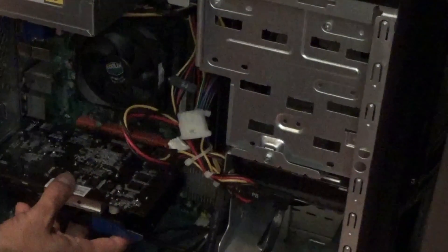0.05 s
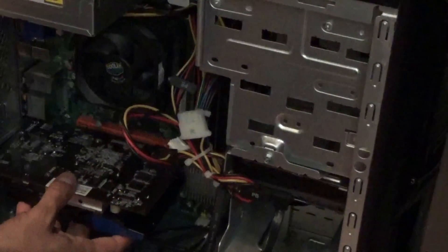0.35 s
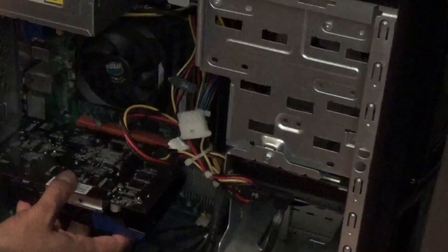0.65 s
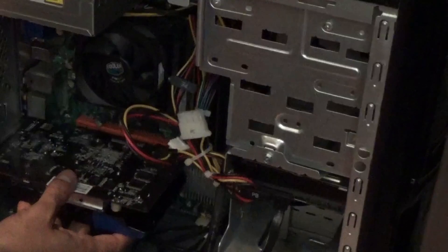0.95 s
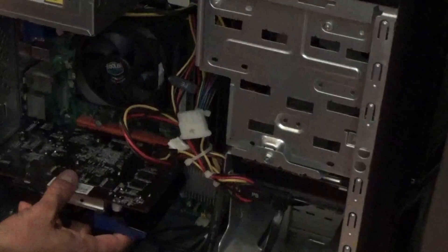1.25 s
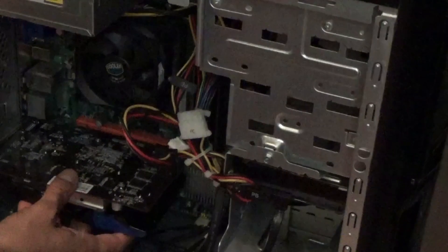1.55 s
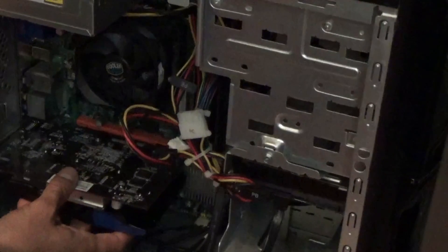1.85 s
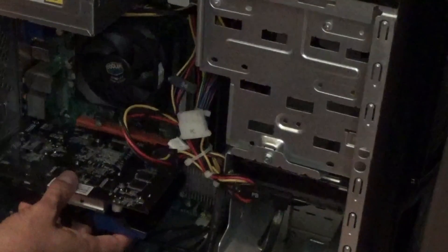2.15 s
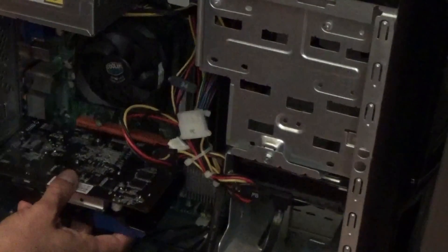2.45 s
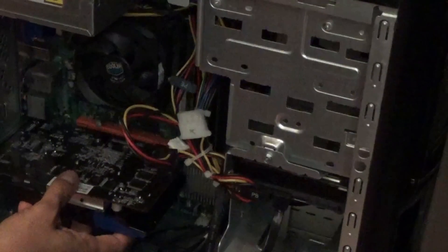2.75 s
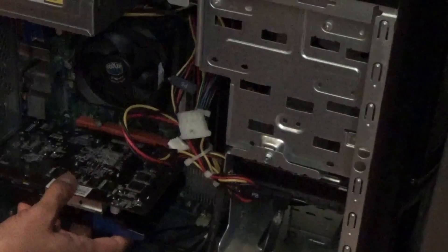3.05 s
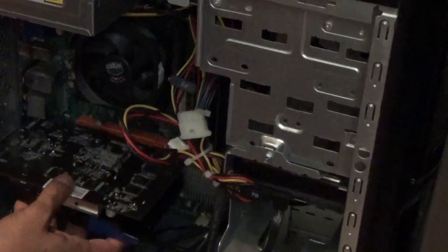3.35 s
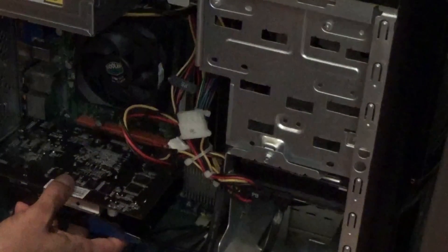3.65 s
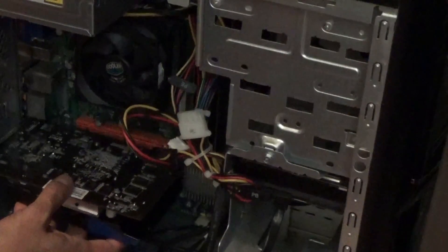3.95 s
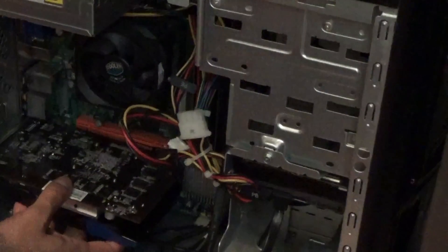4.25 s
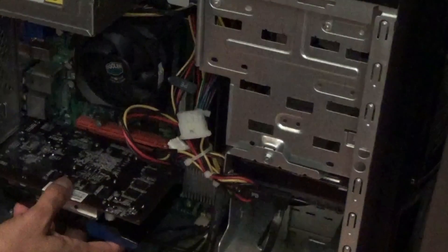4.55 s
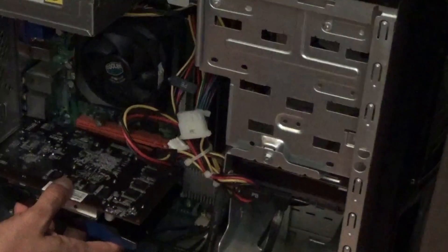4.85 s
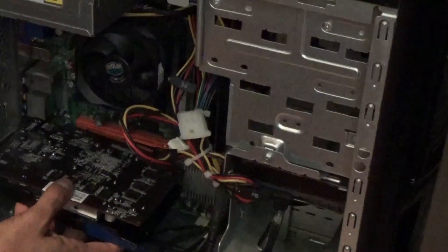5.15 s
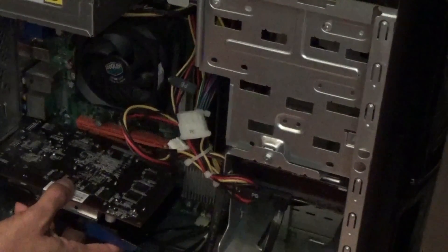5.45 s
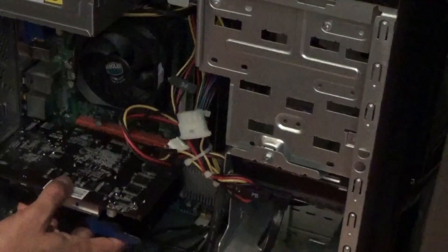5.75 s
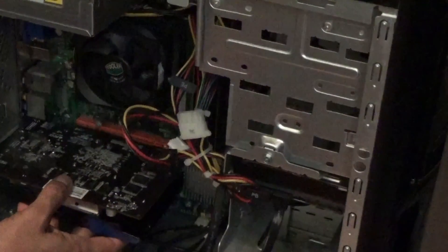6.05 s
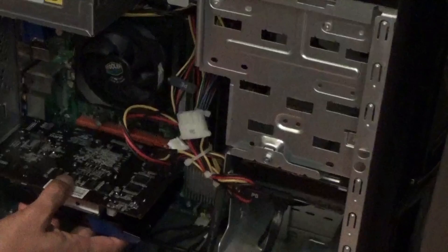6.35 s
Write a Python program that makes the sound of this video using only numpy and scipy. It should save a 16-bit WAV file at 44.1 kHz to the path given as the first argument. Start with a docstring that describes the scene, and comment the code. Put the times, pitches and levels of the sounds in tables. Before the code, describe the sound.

A hand works a graphics card into its slot in an open steel computer case, heard close in a small quiet room. A short scrape and a click come in the first 0.3 seconds, followed by light scrapes and soft taps from about 0.9 to 2.4 seconds. At 2.6 seconds sharp clicks begin a busy run of knocks and gritty scrapes, each setting the sheet metal ringing briefly. This is loudest around 3.5 seconds and again around 4 seconds, and eases after 4.5 seconds into small ticks, slides and faint rubbing. Another sharp click, scrape and knock come at about 5.8 seconds, then two faint scrapes just after 6 seconds. Underneath throughout lie soft room noise, a faint low electrical hum and a very faint, rapid, high ticking.

```python
"""Seating a graphics card

A hand works a card into its slot in an open steel computer case, in a small quiet room.
Card and bracket click, knock and scrape: each contact is a burst of gritty noise that sets the
sheet metal ringing. Underneath lie a faint rapid ticking, soft room noise and mains hum."""
import sys
import numpy as np
from scipy import signal
from scipy.fft import rfft, irfft, next_fast_len
from scipy.io import wavfile
from scipy.ndimage import uniform_filter1d

SR = 44100
rng = np.random.default_rng(int(sys.argv[2]) if len(sys.argv) > 2 else 0)


def unload_wav(signal):
    """Save mono or channel-first audio to the path in sys.argv[1] as 16-bit WAV at rate SR, clipped to [-1, 1]."""
    wavfile.write(
        sys.argv[1],
        SR,
        np.round(np.clip(np.atleast_2d(signal).T, -1, 1) * 32767).astype(np.int16),
    )


N = 282681
TIME = np.arange(N) / SR
FFT_SIZE = next_fast_len(N + SR, True)
FREQS = np.maximum(np.fft.rfftfreq(FFT_SIZE, 1 / SR), 1)

# The card knocks on slot and case: start_s, level_db, hardness_db, t60_s, pitch_hz (0 for no clear note)
# Hardness is treble against mids: bare metal above 0, board and fingertip far below.
# A firm grip shortens the decay.
CARD_KNOCKS = [(0.059, -36, -20, .065, 0), (0.129, -44, -7, .15, 0), (0.268, -29, -2, .16, 3240),
               (1.605, -44.5, -18, .07, 0), (1.7, -42, -10, .2, 1650), (1.833, -41.5, -8, .13, 900),
               (2.145, -39.5, -14, .11, 635), (2.437, -45, -13, .16, 0), (2.6205, -26, 6, .1, 0),
               (2.629, -25, -7, .26, 1286), (2.687, -31, 6, .17, 0), (2.738, -38.5, 5, .11, 0),
               (2.782, -30.5, -30, .08, 0), (2.928, -29, -13, .022, 0), (2.988, -28, -16, .14, 2400),
               (3.04, -29, 3, .28, 0), (3.22, -25.5, -7, .21, 0), (3.413, -35, -11, .11, 0),
               (3.476, -17.5, -1, .22, 2300), (3.619, -40, 2, .14, 0), (3.8155, -32, 1, .18, 0),
               (3.9645, -21, 5, .18, 4130), (4.029, -23, -6, .21, 1260), (4.199, -26.5, -9, .16, 2000),
               (4.237, -25.5, 9, .07, 8900), (4.423, -29.5, -10, .015, 0), (4.446, -28.5, -9, .17, 1496),
               (4.607, -47, -1, .3, 0), (4.756, -43, -4, .1, 0), (4.981, -47, -4, .1, 0),
               (5.589, -35.5, -28, .09, 1273), (5.756, -25.5, 7, .13, 3970), (5.856, -31.5, -5, .15, 2460)]
# The card slides, swelling until it comes to rest: stop_s, level_db, hardness_db, swell_s
CARD_SLIDES = [(0.022, -43.5, 3, .03), (0.177, -34, -5, .03), (0.89, -39.5, 0, .011),
               (1.165, -40.5, -1, .03), (1.215, -44, 1, .03), (1.265, -47, -3, .03), (1.71, -41, -2, .035),
               (1.842, -42, -9, .03), (2.295, -51, 2, .08), (2.705, -31, -4, .02), (3.072, -21, 4, .032),
               (3.09, -24, -8, .03), (3.19, -32, -14, .022), (3.33, -41, -20, .05), (3.37, -42.5, -10, .02),
               (3.459, -26.5, -2, .014), (3.506, -18.5, 1, .028), (3.745, -44.5, 0, .07),
               (3.855, -33.5, -20, .06), (4.088, -18, -2, .055), (4.195, -35, -5, .03),
               (4.277, -31, -6, .1), (4.445, -37, -4, .025), (4.78, -33.5, -5, .03),
               (4.908, -37.5, -1, .01), (5.107, -41.5, 1, .06), (5.313, -41, -2, .006),
               (5.492, -42, -18, .028), (5.633, -42.5, -3, .01), (5.756, -27, 5, .009),
               (5.795, -32.5, -3, .04), (6.112, -48, -14, .01), (6.231, -45.5, -4, .024)]
# Fingers and cables rub lightly between contacts: time_s, level_db
RUB_LEVELS = [(0.2, -51), (0.55, -65), (1.9, -60), (2.9, -59), (3.3, -50), (3.7, -53), (4.35, -46),
              (4.6, -60), (5.55, -59), (6.4, -62)]
# The four bands of a contact (thud, clatter, clink, tick): low_hz, high_hz, tail_share, tail_t60_s
CONTACT_BANDS = [(92, 687, 0.39, 0.43), (702, 2725, 0.41, 0.15), (2660, 5660, 0.12, 0.17),
                 (5970, 10700, 0, 0.6)]
# Standout resonances of the steel case: pitch_hz, width_hz, gain_db
STEEL_MODES = [(232.8, 22, 3.5), (365.7, 28, 0.5), (706, 160, -5.5), (1009, 15, 0), (1303, 53, -1.5),
               (2054, 190, -16), (2240, 36, -6), (3010, 18, -4.5), (3285, 43, -7.5), (3520, 23, -8),
               (3800, 35, -9), (4090, 81, -7.5)]
# Its dense lesser modes, blended into one tone curve: freq_hz, gain_db
STEEL_COLOUR = [(90, -25.5), (185, -13.5), (300, -6), (520, -9.5), (900, -7.5), (1400, -6), (2400, -5.5),
                (2800, -12.5), (4300, -12.5), (5500, -10.5), (6400, -22.5), (7200, -17.5), (8300, -13),
                (11000, -12.5)]
# Stereo width of the nearby case: freq_hz, side_vs_mid_db
CASE_SPREAD = [(170, -24), (600, -17), (3000, -11)]
# Fader curve of the faint ticking: time_s, level_db
TICKING_LEVELS = [(0.8, -59.5), (1.1, -61.5), (3.0, -65)]
# Tone curve of the room noise: freq_hz, gain_db
ROOM_COLOUR = [(12, -30), (20, -4.5), (124, -6.5), (194, -13.5), (233, -2), (273, -13), (365, -12),
               (603, -14.5), (1260, -17.5), (1370, -19.5), (1520, -17), (2200, -24), (3100, -21),
               (11000, -28.5), (14300, -78), (22000, -120)]
# Stereo width of the diffuse room: freq_hz, side_vs_mid_db
ROOM_SPREAD = [(80, -17), (200, -12), (600, 2.5), (11000, -6)]
# Partials of the mains hum: pitch_hz, rms_db
HUM_PARTIALS = [(120, -68), (240, -79)]

KNOCK_SWELL_S, SLIDE_T60_S = .0014, .125   # a swell is the time taken to rise 20 dB
GRAZE_DB, GRAZE_SWELL_S = -22, .014   # an edge grazes just ahead of the hit, this far below it
CUTOFF_HZ = 11020


def card_in_case(level_db, build_cycles):
    """Bursts of tiny impacts drive the chassis, band by band; the thud builds slowest and hangs longest."""
    body = chassis(modes_db=0.5)
    body = body / np.sqrt(np.mean(body ** 2 * (FREQS < CUTOFF_HZ)))
    grit_db = chatter(per_s=800, spread_db=3.5)
    powers = contact_power() + rubbing_power(per_s=22, uneven_db=3.0, hardness_db=-7)
    out = 0
    for (low, high, tail_share, tail_t60), power in zip(CONTACT_BANDS, powers):
        grit = rms_one(from_db(grit_db * np.sqrt(high / CUTOFF_HZ)))   # slips stand out most in the treble
        envelope = np.sqrt(build_up(power, build_cycles / high))
        force = envelope * grit * rng.standard_normal((2, N))
        band = 1 / np.sqrt((1 + (low / FREQS) ** 10) * (1 + (FREQS / high) ** 10))
        vibration = filtered(force, causal(body * band))
        out = out + diffuse_tail(vibration, tail_share, tail_t60)
    return from_db(level_db) * stereo(out, CASE_SPREAD)


def contacts():
    """Knocks and slides on one cue list: peak_s, level_db, hardness_db, swell_s, t60_s."""
    knocks = [(s, db, hardness, KNOCK_SWELL_S, t60) for s, db, hardness, t60, _ in CARD_KNOCKS]
    slides = [(s, db, hardness, swell, SLIDE_T60_S) for s, db, hardness, swell in CARD_SLIDES]
    return knocks + slides


def band_levels(level_db, hardness_db):
    """Thud, clatter, clink and tick in dB: a harder contact has more top and less thud."""
    thud_db = 1.2 - .12 * hardness_db
    clink_db = 1.3 + .68 * hardness_db
    return level_db + np.array([thud_db, 0, clink_db, hardness_db])


def contact_power():
    """Vibration power in each band swells into every contact and dies away after it."""
    power = np.zeros((len(CONTACT_BANDS), N))
    for peak_s, level_db, hardness_db, swell_s, t60 in contacts():
        start_s = peak_s - 2 * max(swell_s, GRAZE_SWELL_S)
        span = slice(max(int(start_s * SR), 0), int((peak_s + t60) * SR))
        t = TIME[span] - peak_s
        rise_db = np.maximum(20 * t / swell_s, GRAZE_DB + 20 * t / GRAZE_SWELL_S)
        envelope_db = np.where(t < 0, rise_db, -60 * t / t60)
        power[:, span] += from_db(band_levels(level_db, hardness_db)[:, None] + envelope_db) ** 2
    return power


def chatter(per_s, spread_db):
    """Edges catch and slip: the force jumps in tiny uneven steps, in dB."""
    slip_index = np.cumsum(rng.random(N) < per_s / SR)
    return spread_db * np.clip(rng.standard_normal(N), -2, 2)[slip_index]


def chassis(modes_db):
    """The tone of the steel case: single resonances stand out of a bed of dense modes."""
    power = from_db(at_freqs(STEEL_COLOUR)) ** 2
    for hz, width_hz, db in STEEL_MODES:
        width_hz = max(width_hz, hz / 30)   # screws and cables damp every mode
        detuning = 2 * (FREQS - hz) / width_hz
        power = power + from_db(db + modes_db) ** 2 / (1 + detuning ** 2) ** 2
    return np.sqrt(power)


def build_up(power, lag_s):
    """Vibration takes a moment to spread through the panels, softening the attack."""
    pole = np.exp(-1 / (lag_s * SR))
    return signal.lfilter([1 - pole], [1, -pole], power)


def diffuse_tail(x, share, t60):
    """A share of the energy hangs on in the panels and the room as a smooth wash."""
    tail = rng.standard_normal(SR) * from_db(-60 * TIME[:SR] / t60)
    response = np.sqrt(1 - share) + np.sqrt(share) * rfft(tail / np.linalg.norm(tail), FFT_SIZE)
    colour = np.sqrt(uniform_filter1d(np.abs(response) ** 2, size=200))
    return filtered(x, response / causal(colour))   # dividing keeps the tone even


def spot_rings(detune, mode_db, count=5):
    """Pitched knocks ring as a cluster of close modes that beat as they fade; high ones need a hard hit."""
    out = np.zeros(N)
    crossovers_hz = [high for _, high, *_ in CONTACT_BANDS[1:-1]]
    for start_s, level_db, hardness_db, _, hz in CARD_KNOCKS:
        if hz > 0:
            band = 1 + np.searchsorted(crossovers_hz, hz)
            db = band_levels(level_db, hardness_db)[band] + mode_db
            t60 = .13 * (2000 / hz) ** .5   # higher spots ring shorter
            offsets = (np.arange(count) + rng.random(count)) / count * 2 - 1
            for offset in offsets:
                add_mode(out, start_s, hz * (1 + detune * offset), db, t60)
    return out


def small_rings(ring_db, typical_t60_s, count=2):
    """Every contact also wakes a few small modes in each band above the thud, new ones each time."""
    out = np.zeros(N)
    for peak_s, level_db, hardness_db, *_ in contacts():
        for (low, high, *_), db in zip(CONTACT_BANDS[1:], band_levels(level_db, hardness_db)[1:]):
            for place, sustain in rng.random((count, 2)):
                hz = low + (high - low) * place
                add_mode(out, peak_s, hz, db + ring_db, typical_t60_s * (.5 + sustain))
    return out


def add_mode(out, start_s, hz, db, t60, rise_s=0.0015):
    """Mix in one struck mode: a sine with a fast attack and a ringing decay."""
    span = slice(int(start_s * SR) + 1, int((start_s + t60) * SR))
    t = TIME[span] - start_s
    envelope = (1 - np.exp(-t / rise_s)) * from_db(db - 60 * t / t60)
    out[span] += envelope * np.sin(2 * np.pi * (hz * t + rng.random()))


def rubbing_power(per_s, uneven_db, hardness_db):
    """Soft rubs come and go with the grip of the hand, feeding a little power into each band."""
    grip = rng.standard_normal(1000)
    grip_db = uneven_db * np.interp(TIME * per_s, np.arange(len(grip)), grip)
    tint = from_db(band_levels(0, hardness_db))[:, None]
    return (tint * from_db(at_times(RUB_LEVELS) + grip_db)) ** 2


def faint_ticking(per_s, centre_hz, width_hz, half_length_s, uneven_db):
    """A fast, regular run of soft ticks, each a blip of narrow-band noise of uneven strength."""
    ticks = (TIME - .013) * per_s + .5   # the first peaks 13 ms in
    from_tick_s = (ticks % 1 - .5) / per_s
    pulses = np.exp(-(from_tick_s / half_length_s) ** 2)
    accent_db = uneven_db * np.clip(rng.standard_normal(N), -2, 1.5)[ticks.astype(int)]
    band = 1 / (1 + ((FREQS - centre_hz) / width_hz) ** 4)
    noise = rms_one(filtered(rng.standard_normal(N), band))
    return noise * pulses * from_db(at_times(TICKING_LEVELS) + accent_db)


def room_tone(air_db):
    """A steady bed of soft, wide air, with the mains humming in the centre."""
    air = rms_one(filtered(rng.standard_normal((2, N)), from_db(at_freqs(ROOM_COLOUR))))
    hum = sum(from_db(db) * np.sqrt(2) * np.sin(2 * np.pi * (hz * TIME + rng.random()))
              for hz, db in HUM_PARTIALS)
    return from_db(air_db) * stereo(air, ROOM_SPREAD) + hum


def from_db(db):
    """Decibels to gain."""
    return 10 ** (np.asarray(db) / 20)


def rms_one(x):
    """Scale to rms 1."""
    return x / np.sqrt(np.mean(x ** 2) + 1e-20)


def at_times(points):
    """Draw a fader curve through (time_s, value) points."""
    return np.interp(TIME, *np.transpose(points))


def at_freqs(points):
    """Draw a curve through (freq_hz, value) points on a log-frequency axis."""
    hz, value = np.transpose(points)
    return np.interp(np.log(FREQS), np.log(hz), value)


def filtered(x, response):
    """Pass x through a frequency response."""
    return irfft(rfft(x, FFT_SIZE) * response, FFT_SIZE)[..., :N]


def causal(magnitude):
    """Minimum-phase response of this magnitude: it rings only after the hit."""
    cepstrum = irfft(np.log(magnitude + 1e-6), FFT_SIZE)
    cepstrum[1:FFT_SIZE // 2] *= 2
    cepstrum[FFT_SIZE // 2 + 1:] = 0
    return np.exp(rfft(cepstrum))


def stereo(pair, spread):
    """Two unrelated signals become the mid and side of the stereo image."""
    mid, side = pair[0], filtered(pair[1], from_db(at_freqs(spread)))
    return np.array([mid + side, mid - side])


def scene():
    """Card and ringing steel up front, ticking and room tone far behind."""
    rings = spot_rings(detune=0.09, mode_db=-7.5) + small_rings(ring_db=-14.0, typical_t60_s=0.095)
    ticking = faint_ticking(per_s=30, centre_hz=3080, width_hz=390, half_length_s=0.0029, uneven_db=2.5)
    card = card_in_case(level_db=-0.5, build_cycles=4.2)
    return card + rings + ticking + room_tone(air_db=-57.5)


def record(dry):
    """A steep high cut takes the very top off the mix."""
    return signal.sosfilt(signal.cheby1(14, .2, CUTOFF_HZ, fs=SR, output="sos"), dry)


dry = scene()
out = record(dry)
unload_wav(out)
```